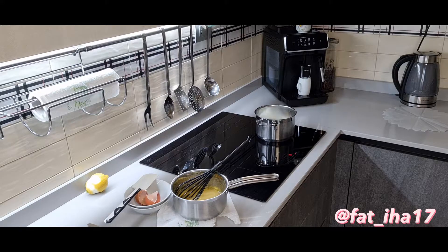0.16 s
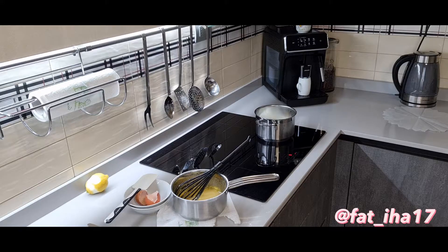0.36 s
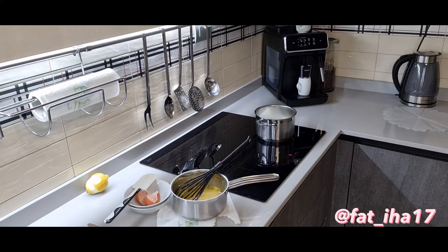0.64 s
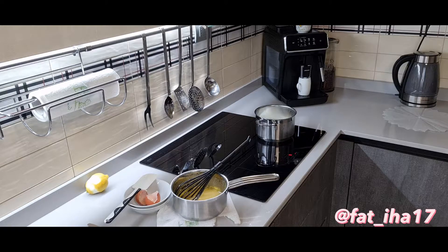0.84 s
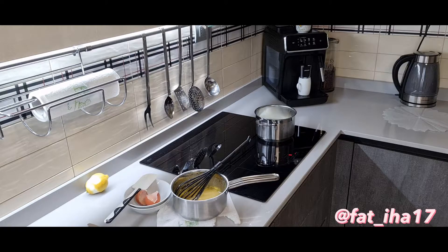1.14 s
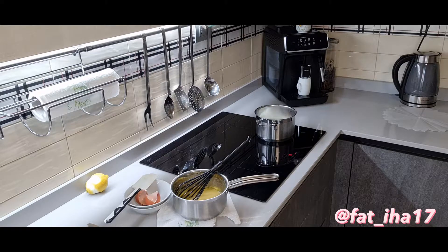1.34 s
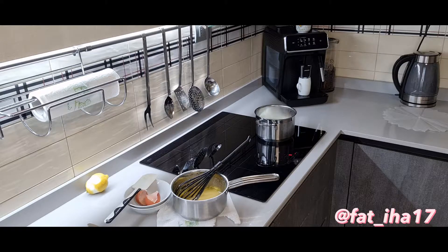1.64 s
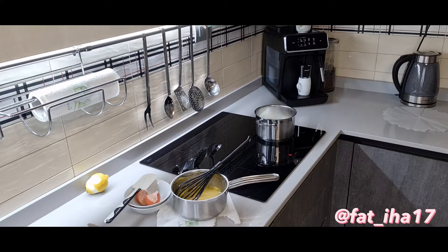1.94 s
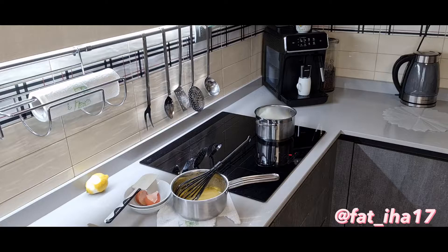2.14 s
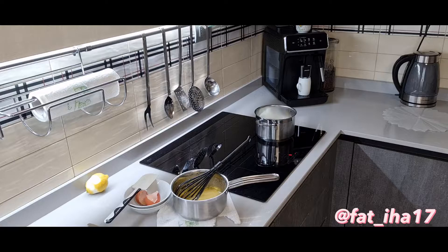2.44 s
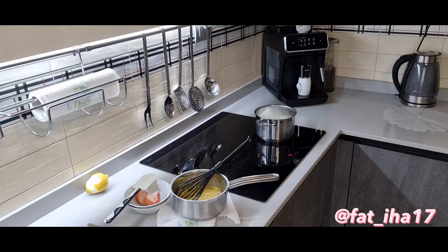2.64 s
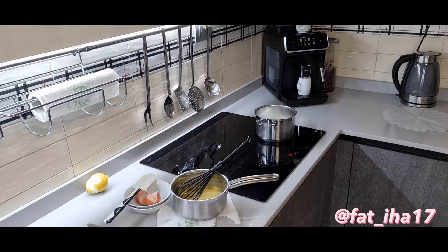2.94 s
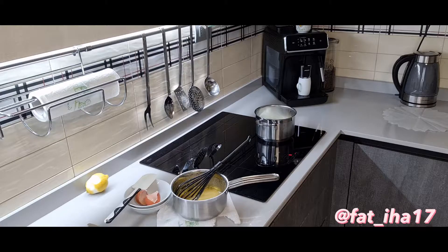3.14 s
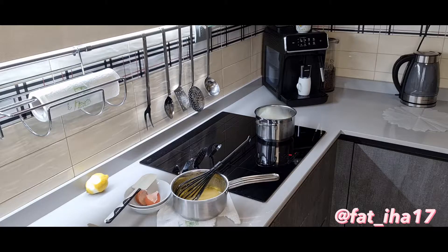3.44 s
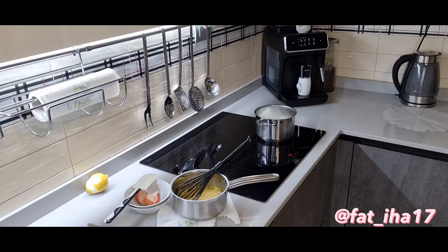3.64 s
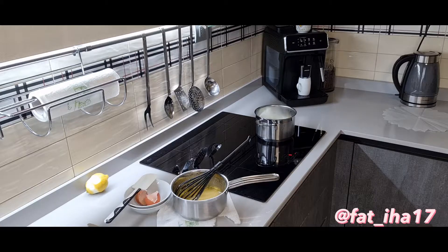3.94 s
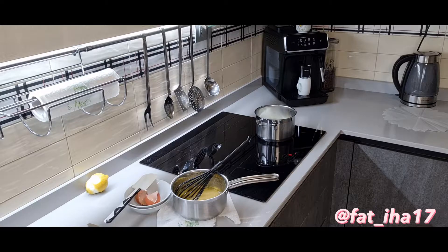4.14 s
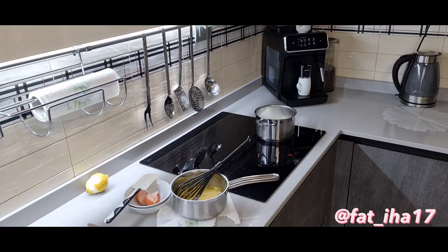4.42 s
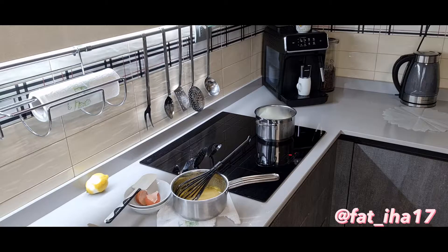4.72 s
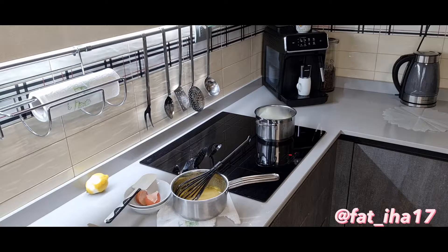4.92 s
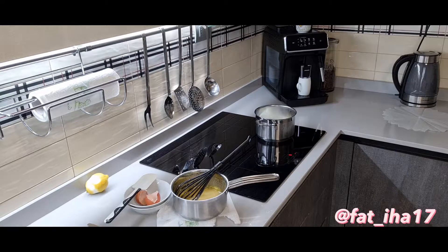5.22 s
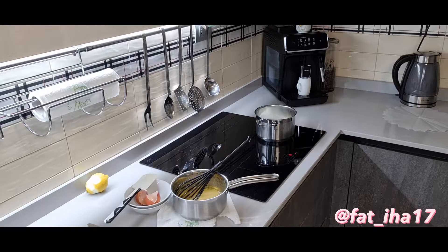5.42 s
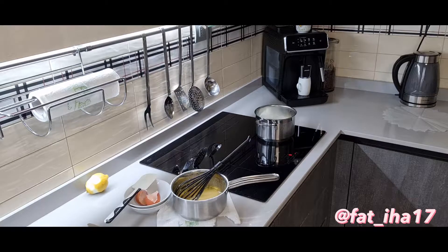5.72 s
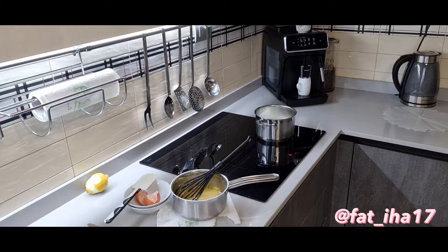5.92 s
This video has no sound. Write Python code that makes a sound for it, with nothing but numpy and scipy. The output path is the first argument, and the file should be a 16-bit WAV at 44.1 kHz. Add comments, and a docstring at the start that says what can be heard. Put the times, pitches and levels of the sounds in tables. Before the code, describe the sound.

In a hard-walled kitchen, an appliance hums faintly while someone shuffles about and handles small things with light ticks and one faint clink. A brief scrape and a few soft knocks follow. Then a wooden cupboard door, a few metres from the microphone, bangs loudly twice, its catch clacking on the first bang. Quiet rustling and dry crackles come afterwards.

```python
"""A hard-walled kitchen, a cupboard a few metres away. An appliance hums on the mains.
Someone shuffles about and handles small things: rustles, ticks, dry crackles, one faint clink.
Something scrapes briefly and knocks softly, then the door bangs twice, heard mostly through the room.
Each bang is a crack of wood on wood, a panel boom and a ringing carcass; the catch clacks in the first."""
import sys
import numpy as np
from scipy import signal
from scipy.fft import rfft, irfft
from scipy.io import wavfile

SR = 44100
rng = np.random.default_rng(int(sys.argv[2]) if len(sys.argv) > 2 else 0)


def master_out(mix):
    """Clip the mix to full scale and print it as 16-bit PCM to the path in sys.argv[1]."""
    frames = np.transpose(np.atleast_2d(mix))
    ceiling = np.clip(frames, -1, 1)
    pcm = np.round(ceiling * 32767).astype(np.int16)
    wavfile.write(sys.argv[1], SR, pcm)


N = 267876
TIME_S = np.arange(N) / SR
RING_S = TIME_S[:SR]


def amp(db):
    """Decibels to gain."""
    return 10 ** (np.asarray(db) / 20)


def unit_rms(x):
    """Scales to an rms of 1."""
    return x / np.sqrt(np.mean(x ** 2) + 1e-20)


def lookup(table, hz):
    """Interpolates a table over log frequency."""
    table_hz, value = np.transpose(table)
    return np.interp(np.log(hz + 1), np.log(table_hz + 1), value)


def add(mix, start_s, sound):
    """Mixes a sound in at start_s."""
    part = mix[..., round(start_s * SR):][..., :sound.shape[-1]]
    part += sound[..., :part.shape[-1]]


def click(spectrum, size=4096):
    """Minimum-phase pulse of unit energy with the given spectral shape."""
    log_gain = np.log(amp(lookup(spectrum, abs(np.fft.fftfreq(size, 1 / SR)))))
    pulse = np.fft.ifft(np.exp(np.conj(signal.hilbert(log_gain)))).real
    return pulse / np.linalg.norm(pulse)


def convolve(x, response):
    """Filters x, keeping its length."""
    return signal.fftconvolve(np.atleast_2d(x), np.atleast_2d(response), axes=1)[:, :x.shape[-1]]


# Stereo width of the room: freq_hz, side_minus_mid_db
STEREO_WIDTH = [(60, -3.5), (125, -17), (250, -10.5), (500, -6), (1000, 0.64), (4000, -0.2), (15000, 1.5)]


def diffuse(noise):
    """Two independent noises as a diffuse field, narrower in the bass."""
    size = noise.shape[1]
    mid, side = rfft(noise)
    width = amp(lookup(STEREO_WIDTH, np.fft.rfftfreq(size, 1 / SR)))
    return irfft(np.array([mid + width * side, mid - width * side]) / np.sqrt(1 + width ** 2), size)


def mode(hz, t60_s, rise_s):
    """A resonance builds and dies; high ones arrive further out of phase left and right."""
    lag_rad = np.arctan(amp(lookup(STEREO_WIDTH, hz))) * rng.choice([-1, 1]) * np.array([[1], [-1]])
    envelope = amp(-60 * RING_S / t60_s) * (1 - np.exp(-RING_S / rise_s))
    return np.sin(2 * np.pi * hz * RING_S + lag_rad) * envelope


# Room decay: freq_hz, t60_s
ROOM_DECAY = [(80, 0.26), (300, 0.66), (900, 0.64), (2500, .67), (4000, .62), (6000, 0.58), (9000, 0.47),
              (15000, 0.21)]


def kitchen(direct_db, early_db, early_s=0.017):
    """Room response: weak direct path, thickening reflections, a tail that dies band by band."""
    arrivals = rng.random((2, SR)) < np.clip(0.08 + 4 * RING_S, 0, 1)
    taps = diffuse(arrivals * rng.standard_normal((2, SR)) / np.sqrt(np.clip(0.11 + 4 * RING_S, 0, 1)))
    hz, t, bands = signal.stft(taps, SR, nperseg=256)
    decay = amp(-60 * t / lookup(ROOM_DECAY, hz)[:, None])
    tail = signal.istft(bands * decay, SR, nperseg=256)[1][:, :SR]
    tail *= (1 + amp(early_db) * np.exp(-RING_S / early_s)) * (1 - np.exp(-RING_S / 0.0013))
    tail /= np.sqrt(np.sum(tail ** 2) / 2)
    tail[:, 0] += amp(direct_db)
    return tail


def friction(stroke, spectrum, slips_per_s, uneven_db, room):
    """Tiny slips of uneven size follow the stroke's strength and sound into the room."""
    slips = (rng.random(N) < slips_per_s / SR) * rng.choice([-1, 1], N)
    slips = unit_rms(slips * amp(uneven_db * np.minimum(rng.exponential(1, N), 4)))
    return convolve(convolve(slips * stroke, click(spectrum)), room)


# Room air: freq_hz, relative_db
AIR_SPECTRUM = [(25, -19), (48, -12.5), (68, -3), (120, -13.5), (250, -6.5), (450, -12.5), (780, -15.5),
                (980, -25), (1800, -26), (3000, -29.5), (5000, -40.5), (8000, -41.5), (11000, -59),
                (13500, -36)]


def air(level_db=-59.5):
    """Steady, diffuse room noise, mostly low."""
    noise = diffuse(rng.standard_normal((2, N)))
    return amp(level_db) * unit_rms(convolve(noise, click(AIR_SPECTRUM)))


def whine(pitch_hz=14900, half_width_hz=140, level_db=-77):
    """A thin, high band of noise."""
    peak = 1 / (1 + ((np.fft.rfftfreq(N, 1 / SR) - pitch_hz) / half_width_hz) ** 2)
    return amp(level_db) * unit_rms(irfft(rfft(rng.standard_normal((2, N))) * peak, N))


# Hum partials: pitch_hz, level_db
HUM_PARTIALS = [(100, -61), (200, -96), (300.4, -61.5), (400, -72), (586, -77), (781, -79.5)]
# Hum swell: time_s, gain_db
HUM_GAIN = [(0, 1.5), (4.6, 0.5), (5.3, 2.5)]


def mains_hum(waver=0.099):
    """An appliance hums, wavering slightly, a little louder near the end."""
    hum = np.zeros(N)
    for hz, db in HUM_PARTIALS:
        drift = signal.resample(rng.standard_normal(40) + 1j * rng.standard_normal(40), N)
        tone = np.exp(2j * np.pi * (hz * TIME_S + rng.random()))
        hum += np.sqrt(2) * amp(db) * ((1 + waver * drift) * tone).real
    return hum * amp(np.interp(TIME_S, *np.transpose(HUM_GAIN)))


# Shuffling movements: start_s, length_s, level_db
SHUFFLES = [(0.583, 0.24, -61), (1.015, 0.12, -56.5), (1.204, 0.2, -64), (1.342, 0.23, -59),
            (1.77, 0.62, -56.5), (2.512, 0.84, -63.5), (3.253, 0.23, -57), (3.399, 0.072, -46),
            (3.48, 0.17, -50), (3.951, 0.34, -69.5), (4.597, 0.16, -61), (4.81, 0.18, -60.5),
            (4.967, 0.95, -60.5), (5.725, 0.12, -59.5), (5.835, 0.22, -66)]
# Rustle: freq_hz, relative_db
RUSTLE_SPECTRUM = [(200, -10.5), (600, -1), (1100, -0.5), (1700, -0.5), (2900, -1.5), (5000, -6.5),
                   (9000, -12.5), (13000, -13.5), (15500, -5.5)]


def rustle(stir_db=-74.5, arch_exponent=0.42):
    """Each movement speeds up and slows in one arch, over a faint constant stir."""
    power = amp(stir_db) ** 2
    for start_s, length_s, db in SHUFFLES:
        arch = np.maximum(np.sin(np.pi * np.clip((TIME_S - start_s) / length_s, 0, 1)), 0)
        power = power + (amp(db) * arch ** arch_exponent) ** 2
    room = kitchen(direct_db=-11.5, early_db=0)
    return friction(np.sqrt(power), RUSTLE_SPECTRUM, slips_per_s=1200, uneven_db=6.5, room=room)


# Hand squeezes: peak_s, level_db
GRIPS = [(4.62, -69), (5.125, -58.5), (5.39, -64), (5.56, -64.5)]
# Crackle: freq_hz, relative_db
CRACKLE_SPECTRUM = [(1000, -1), (4000, -1), (8000, 5.5), (13000, 6), (15800, 4.5)]


def crackle(grip_db_per_s=224, release_db_per_s=140):
    """Something crackles in a hand that tightens quickly and lets go more slowly."""
    stroke = np.zeros(N)
    for peak_s, db in GRIPS:
        drop_db = np.maximum(grip_db_per_s * (peak_s - TIME_S), release_db_per_s * (TIME_S - peak_s))
        stroke += amp(db - drop_db)
    room = kitchen(direct_db=-4, early_db=6)
    return friction(stroke, CRACKLE_SPECTRUM, slips_per_s=420, uneven_db=5, room=room)


def clink(start_s=1.11, level_db=-62):
    """A brushed utensil rings on one thin note."""
    out = np.zeros((2, N))
    add(out, start_s, amp(level_db) * mode(hz=3200, t60_s=0.4, rise_s=0.005))
    return out


# Handled things: start_s, level_db, centre_hz, width_octaves
HANDLING_TICKS = [(1.025, -21.5, 536, 0.45), (1.024, -36, 4930, 2.2), (1.079, -28.5, 3200, 1.2),
                  (1.1, -26.5, 535, 0.21), (1.344, -25, 3670, 1.1), (1.362, -21.5, 2650, 0.78),
                  (1.37, -24, 390, 1.07), (1.589, -22.5, 1350, 0.85), (1.811, -33.5, 4000, 2.3),
                  (2.172, -15.5, 620, 1.03), (2.222, -15, 490, 1.2), (2.98, -23.5, 1760, 1.08),
                  (3.051, -18, 1290, 1.16), (3.409, -16.5, 5500, 2.5), (4.884, -27, 1490, .9),
                  (5.04, -27, 2450, 2.2), (5.102, -17, 3920, 0.76), (5.305, -19.5, 3060, 0.27),
                  (5.378, -27, 3220, 0.55), (5.473, -21, 3080, 0.3), (5.551, -29, 3200, 0.38)]


def ticks(skirt_db=-12):
    """Small things touch: one broad resonance each, with more fizz the harder the thing."""
    out = np.zeros((2, N))
    grid_hz = np.geomspace(30, 16000, 60)
    for start_s, db, centre_hz, octaves in HANDLING_TICKS:
        hump = amp(-6 * (np.log2(grid_hz / centre_hz) / octaves) ** 2)
        fizz = amp(skirt_db) * min(centre_hz / 3000, 1) ** 2
        pulse = click(np.transpose([grid_hz, 20 * np.log10(hump + fizz)]))
        room = kitchen(direct_db=-21, early_db=-6.5, early_s=0.034)
        add(out, start_s, amp(db) * convolve(room, pulse))
    return out


# Scrape: freq_hz, relative_db
SCRAPE_SPECTRUM = [(200, -21), (400, -18), (650, -9.5), (870, -36), (1170, 2.5), (1350, -8.5), (2200, 4),
                   (2700, 1.5), (3050, 5), (3700, -2), (5000, -1.5), (8000, -8.5), (12000, -6.5),
                   (15800, -9.5)]


def scrape(start_s=2.142, rise_s=0.0048, slide_s=0.048, slide_db=-31.5):
    """Friction with a sharp bite, a short even slide and a quick run-out."""
    bite_db, bite_s, run_out_db_per_s = 8, 0.006, 270
    t = np.maximum(TIME_S - start_s, 0)
    db = slide_db + bite_db * np.exp(-t / bite_s) - run_out_db_per_s * np.maximum(t - slide_s, 0)
    stroke = np.minimum(t / rise_s, 1) * amp(db)
    room = kitchen(direct_db=-12, early_db=-4)
    return friction(stroke, SCRAPE_SPECTRUM, slips_per_s=6000, uneven_db=3, room=room)


# Door and carcass modes: pitch_hz, t60_s, first_bang_db, second_bang_db
DOOR_MODES = [(72.7, 0.57, -27.5, -28), (85.2, 0.65, -32, -32), (108.5, 1, -37, -38),
              (145.6, 0.69, -30, -23), (169.5, 0.53, -21.5, -23), (198, 0.56, -22, -42),
              (236.6, 0.67, -47, -34.5), (350, 0.48, -30, -27), (385, 0.99, -42.5, -66),
              (435, 0.41, -55, -22.5), (447, 0.6, -54, -34), (550, .4, -66, -56), (696, 0.58, -57, -36),
              (785, 0.18, -30, -21.5), (1122, 0.87, -44, -45), (1470, 0.24, -51, -29),
              (1350, 0.41, -44, -51), (1660, 0.098, -66, -20), (1636, 0.28, -63, -30.5),
              (1817, 0.12, -54, -17.5), (1870, 0.54, -37, -50), (2100, 0.62, -48, -34),
              (2170, 0.32, -50, -30), (2170, 0.29, -51, -35), (2600, .34, -59, -48), (2770, 0.12, -36, -52),
              (2700, .4, -52, -41), (2912, 0.34, -58, -50)]
# Bumps on the door: start_s, boom_db, ring_db
DOOR_KNOCKS = [(2.239, -44.5, -40.5), (2.868, -51.5, -52), (3.006, -45, -48), (3.078, -46, -47),
               (3.546, -48, -44)]


def knocks(boom_hz=99.5, boom_s=0.055, centre_hz=176, half_width_octaves=0.19):
    """Soft bumps flex the panel and stir only the cupboard's low modes."""
    out = np.zeros((2, N))
    t = RING_S[:round(boom_s * SR)]
    boom = np.sin(2 * np.pi * boom_hz * t) * signal.windows.tukey(len(t), 0.5)
    for start_s, boom_db, ring_db in DOOR_KNOCKS:
        add(out, start_s, amp(boom_db) * boom)
        for hz, t60_s, *_ in DOOR_MODES[:8]:
            off_centre = np.log2(hz / centre_hz) / half_width_octaves
            add(out, start_s, amp(ring_db) / (1 + off_centre ** 2) * mode(hz, t60_s, rise_s=0.0021))
    return out


# Catch modes: pitch_hz, t60_s, level_db
CATCH_MODES = [(1794, 0.14, -41), (2095, 0.17, -25), (2360, 0.042, -21.5), (2440, 0.13, -40),
               (2570, 0.045, -22), (2820, 0.28, -38.5)]


def catch(start_s=3.175, echo_db=-3.5):
    """The catch snaps: close, short modes beat and echo in the room."""
    out = np.zeros((2, N))
    clack = sum(amp(db) * mode(hz, t60_s, rise_s=0.0015) for hz, t60_s, db in CATCH_MODES)
    echo = convolve(clack[0], kitchen(direct_db=-30, early_db=3))
    add(out, start_s, clack + amp(echo_db) * echo)
    return out


# Door contacts, two per bang: start_s, level_db, bang_index, cutoff_hz
DOOR_CONTACTS = [(3.172, 0.5, 0, 12000), (3.176, 4.5, 0, 7050), (3.592, 9, 1, 1490), (3.599, 6, 1, 14000)]
# Wood crack, one spectrum per bang: freq_hz, relative_db
CRACK_SPECTRA = [
    [(40, -70), (80, 11), (200, 1), (420, 2), (750, -7.5), (1100, -9.5), (1600, -11), (2300, -5),
     (2900, -10.5), (3600, -14.5), (5500, -24), (8000, -34.5), (15000, -32)],
    [(40, -4), (80, -6), (200, -5.5), (420, -3), (750, -8.5), (1100, -12.5), (1600, -5.5), (2300, -5),
     (2900, -6), (3800, -12), (5500, -21), (8000, -31.5), (15000, -34)],
]
# Panel flex, one per bang: start_s, level_db, pitch_hz, length_s
PANEL_BOOMS = [(3.180, -19, 103, 0.071), (3.604, -16, 103.4, 0.065)]


def door_bangs():
    """Wood cracks on wood, the panel booms, door and carcass ring."""
    out = np.zeros((2, N))
    for start_s, db, bang, cutoff_hz in DOOR_CONTACTS:
        softness = signal.butter(1, cutoff_hz, fs=SR)
        crack = signal.lfilter(*softness, click(CRACK_SPECTRA[bang]))
        add(out, start_s, amp(db) * convolve(kitchen(direct_db=-24.5, early_db=-36), crack))
    for bang, (start_s, db, boom_hz, length_s) in enumerate(PANEL_BOOMS):
        t = RING_S[:round(length_s * SR)]
        boom = np.cos(2 * np.pi * boom_hz * (t - 0.006)) * signal.windows.tukey(len(t), 0.4)
        add(out, start_s, amp(db) * boom)
        for hz, t60_s, *levels_db in DOOR_MODES:
            add(out, start_s, amp(levels_db[bang]) * mode(hz, t60_s, rise_s=0.014))
    return out


def scene():
    """Background, handling and cupboard, summed in stereo."""
    background = air() + whine() + mains_hum()
    handling = rustle() + crackle() + clink() + ticks()
    cupboard = scrape() + knocks() + catch() + door_bangs()
    return background + handling + cupboard


def record(dry, low_cut_hz=42, high_cut_hz=15900):
    """Bass roll-off and a steep treble limit."""
    highpass = signal.butter(3, low_cut_hz, "highpass", fs=SR, output="sos")
    lowpass = signal.firwin(511, high_cut_hz, window=("kaiser", 9), fs=SR)
    return signal.oaconvolve(signal.sosfilt(highpass, dry), lowpass[None], "same")


dry = scene()
out = record(dry)
master_out(out)
```